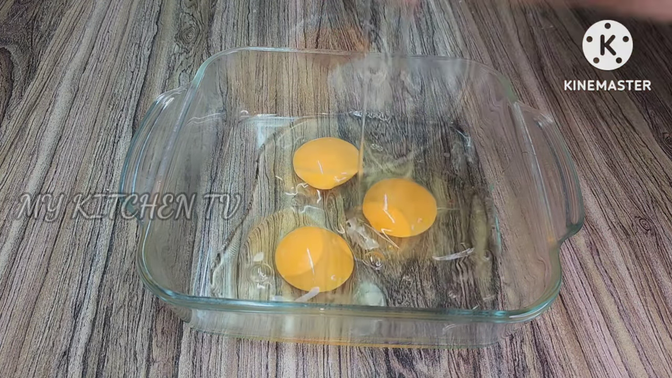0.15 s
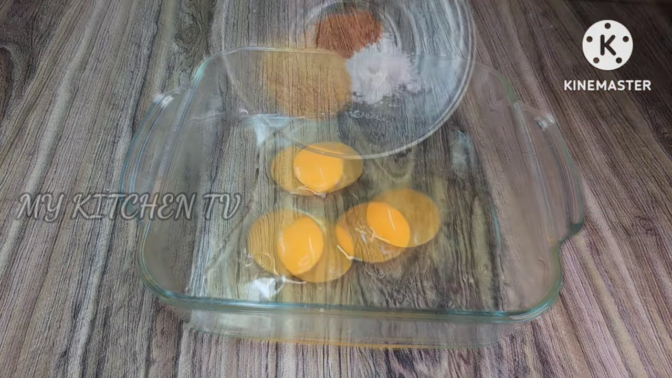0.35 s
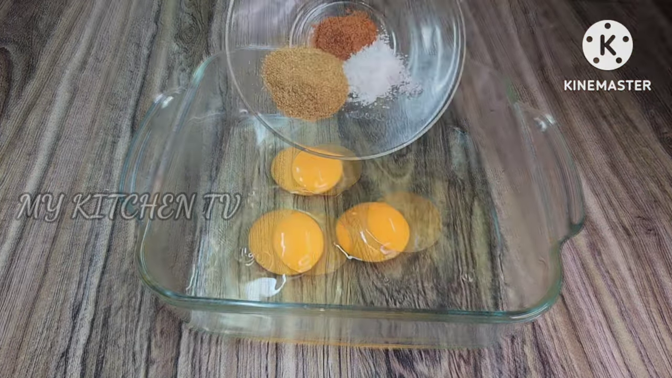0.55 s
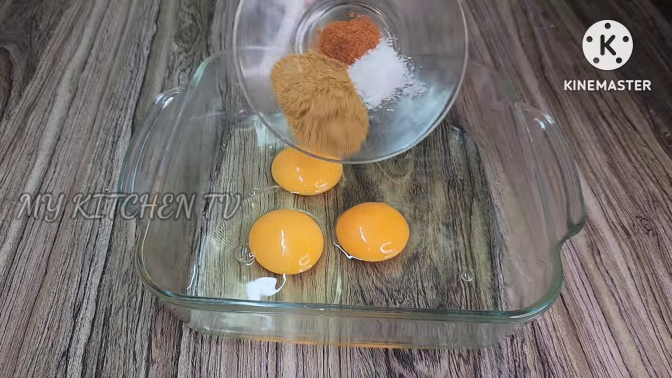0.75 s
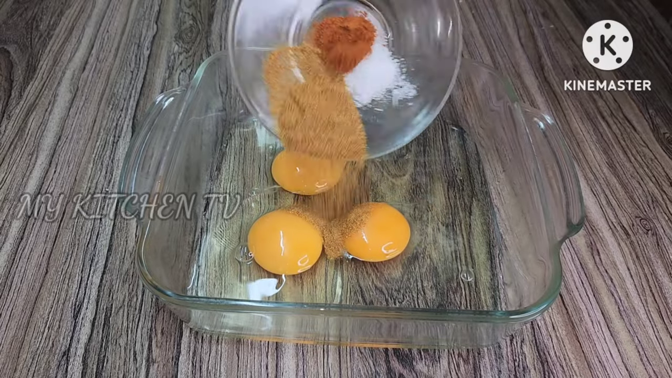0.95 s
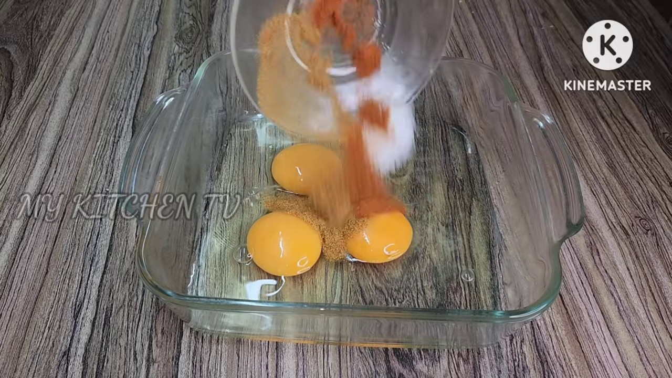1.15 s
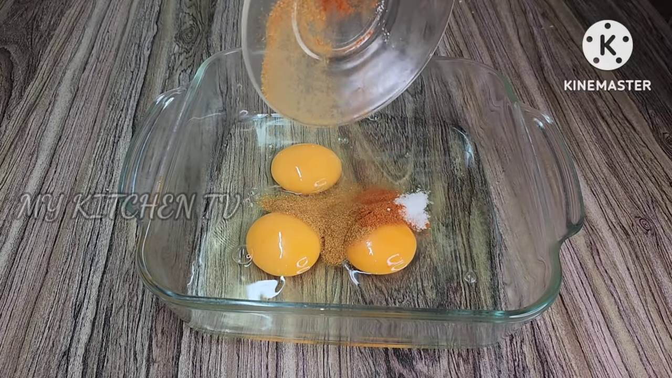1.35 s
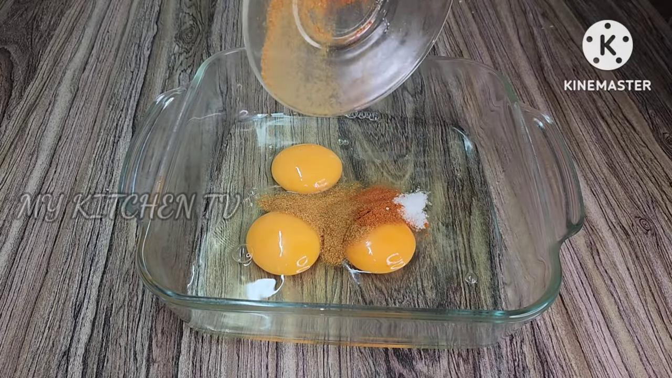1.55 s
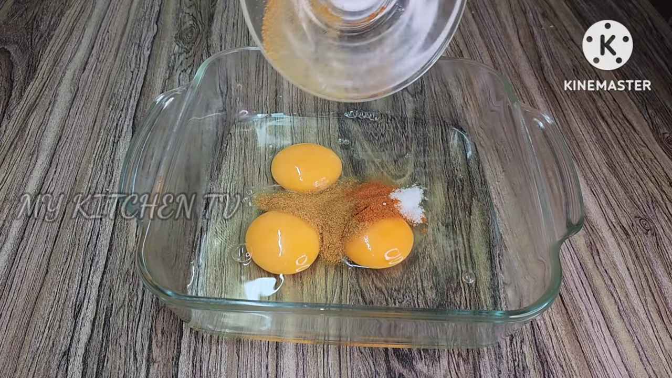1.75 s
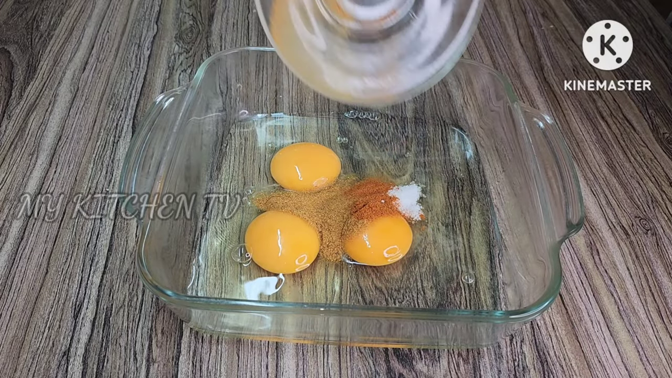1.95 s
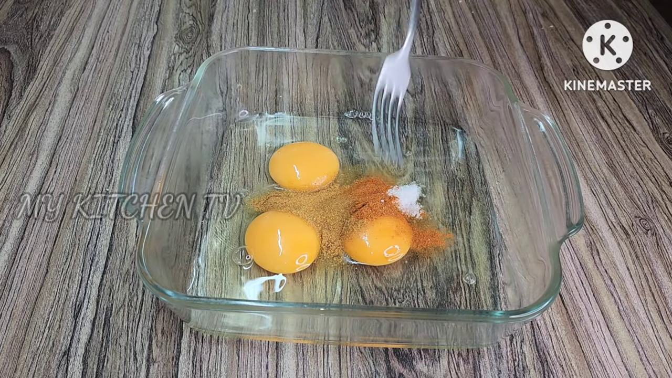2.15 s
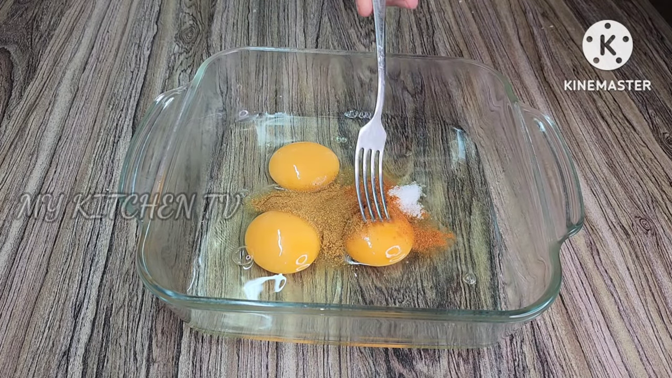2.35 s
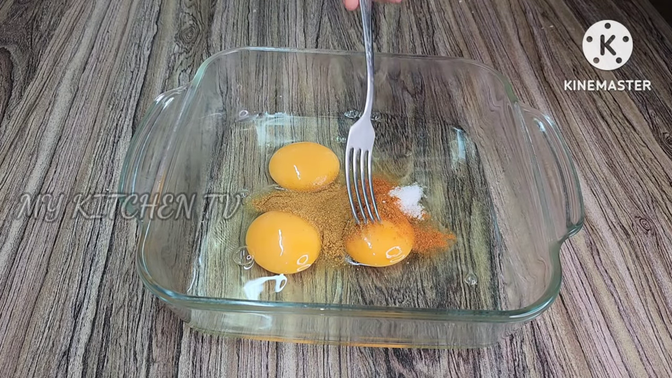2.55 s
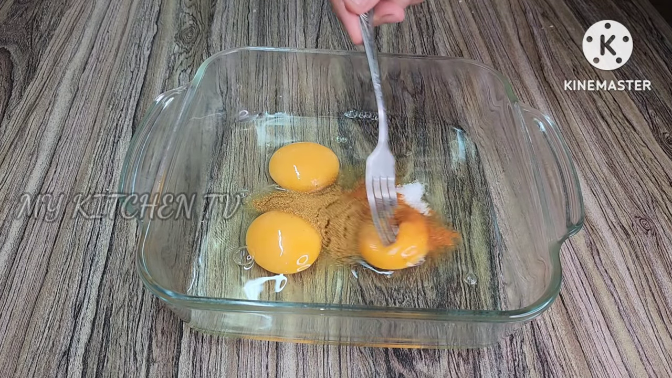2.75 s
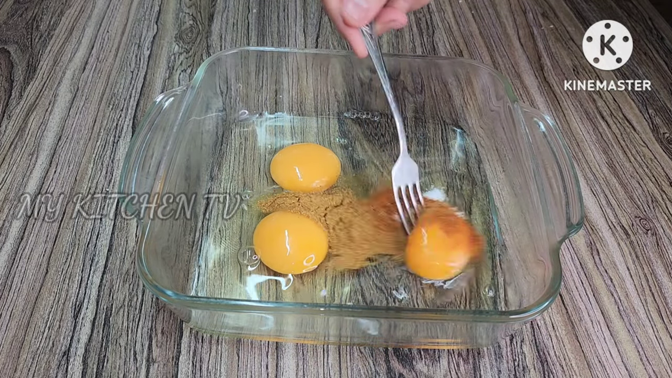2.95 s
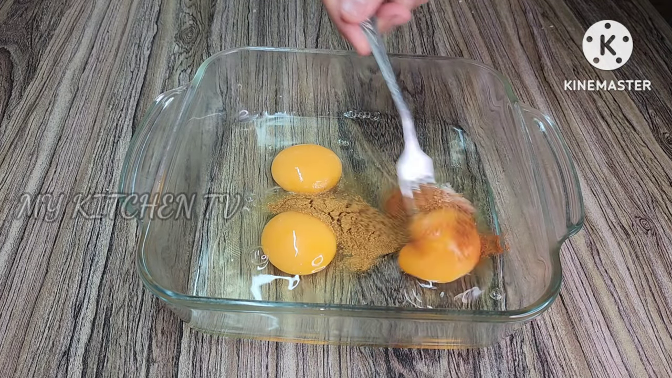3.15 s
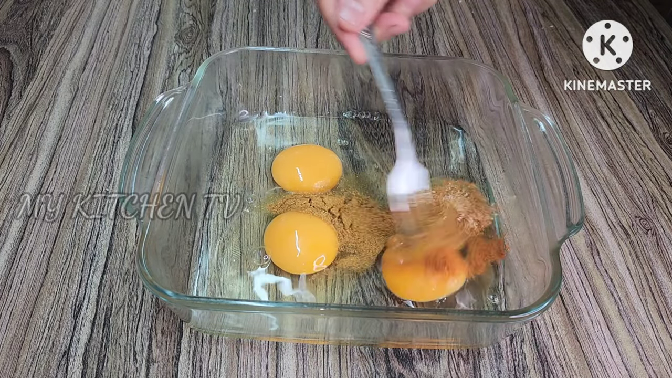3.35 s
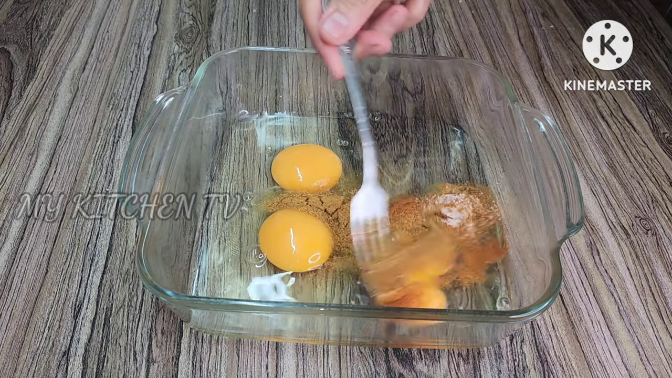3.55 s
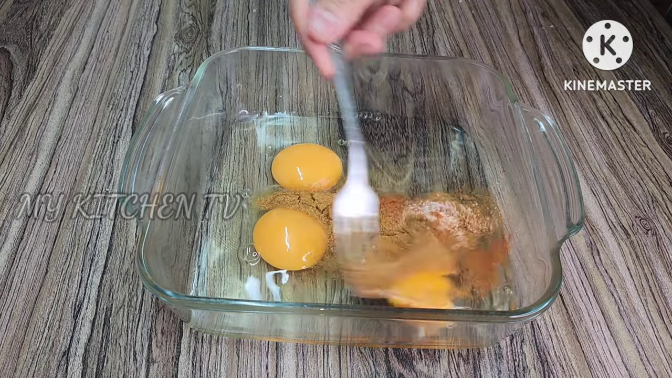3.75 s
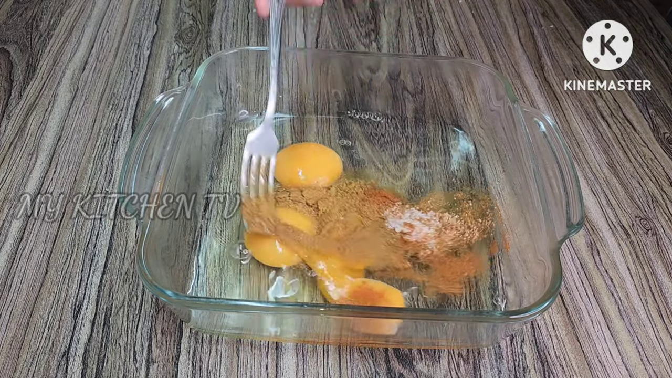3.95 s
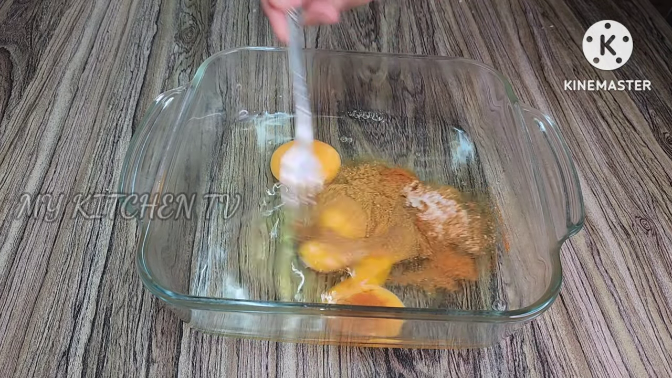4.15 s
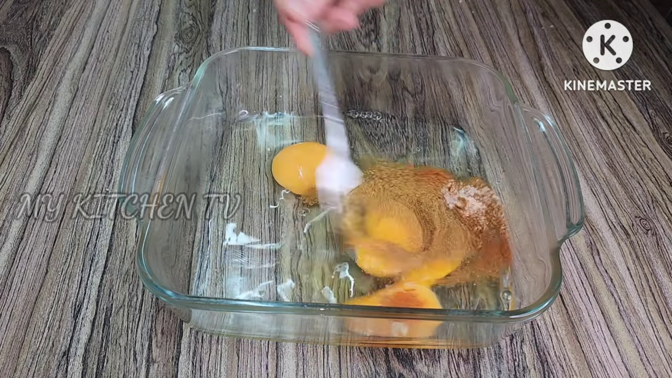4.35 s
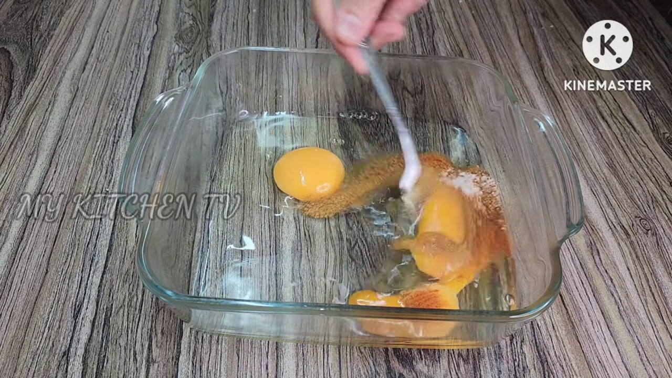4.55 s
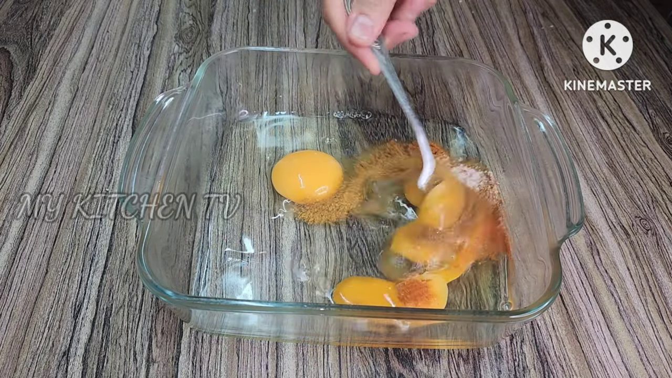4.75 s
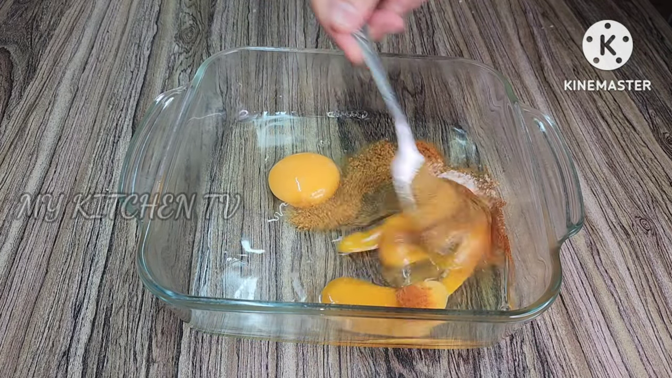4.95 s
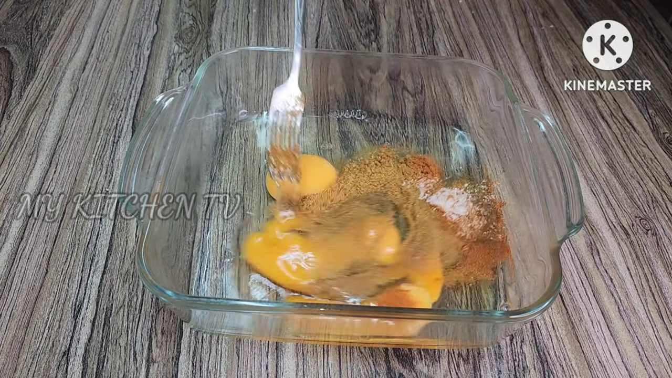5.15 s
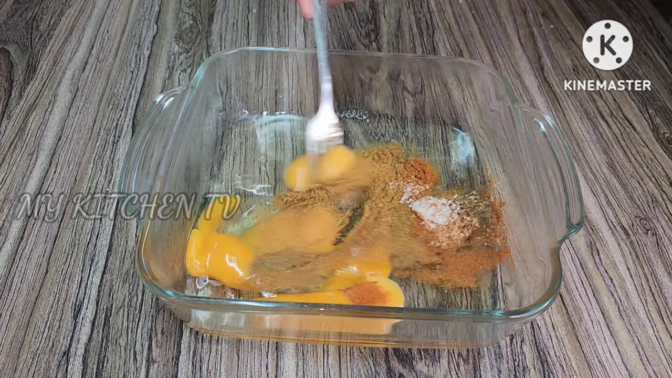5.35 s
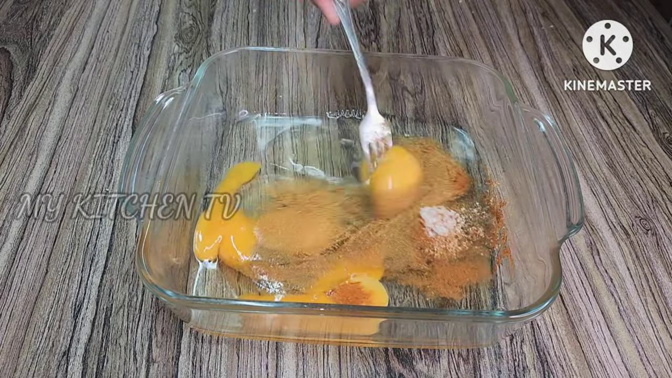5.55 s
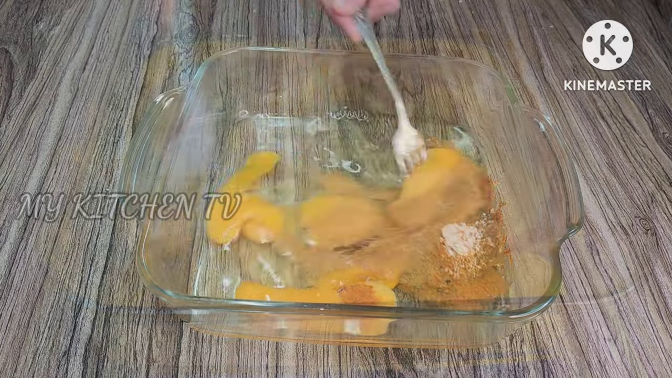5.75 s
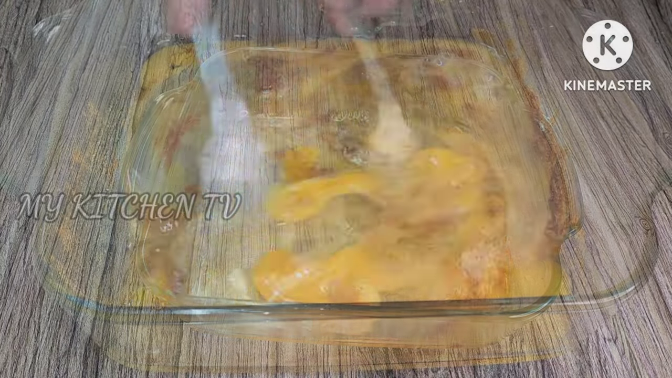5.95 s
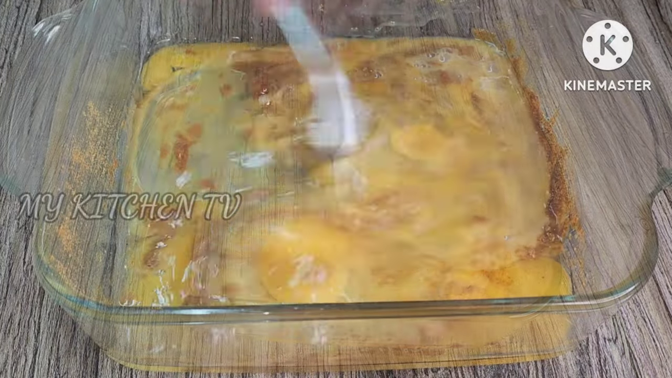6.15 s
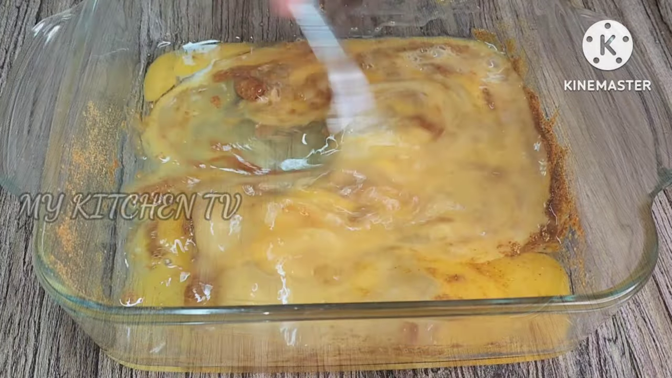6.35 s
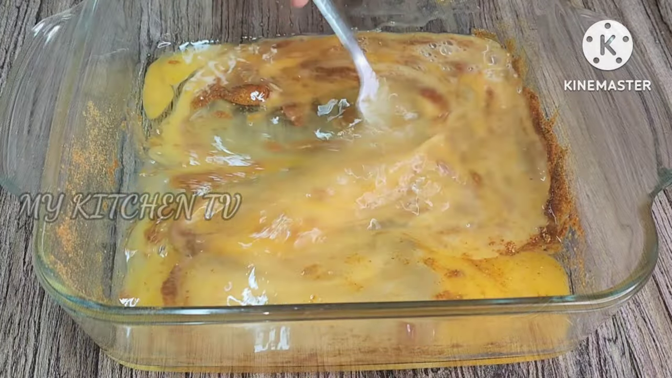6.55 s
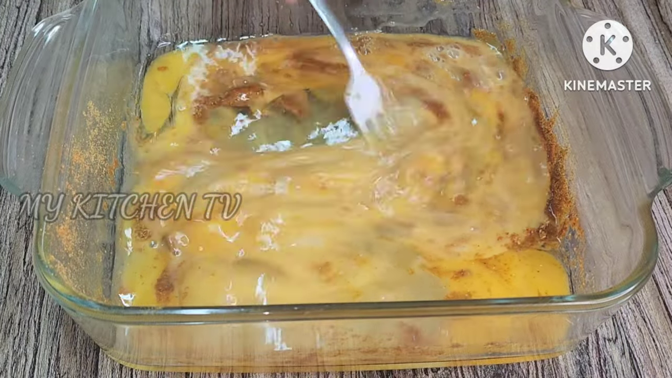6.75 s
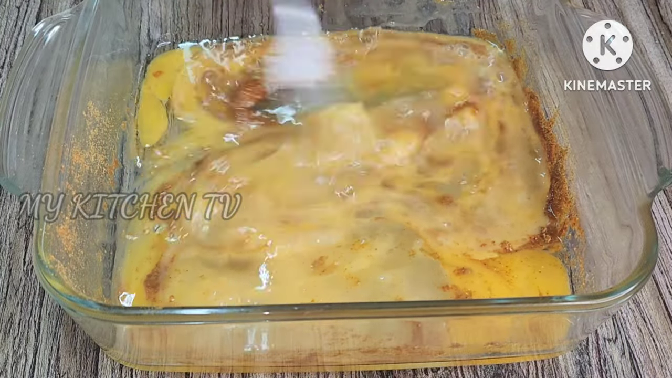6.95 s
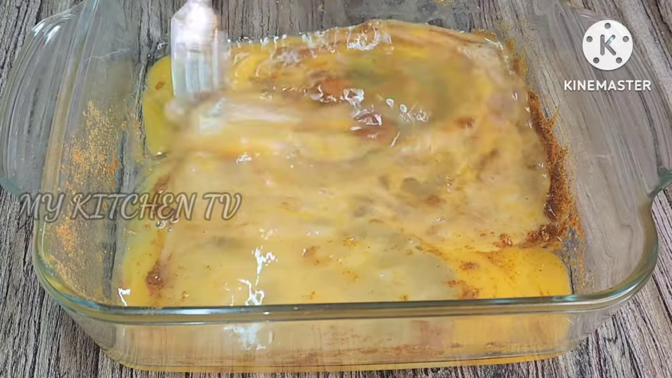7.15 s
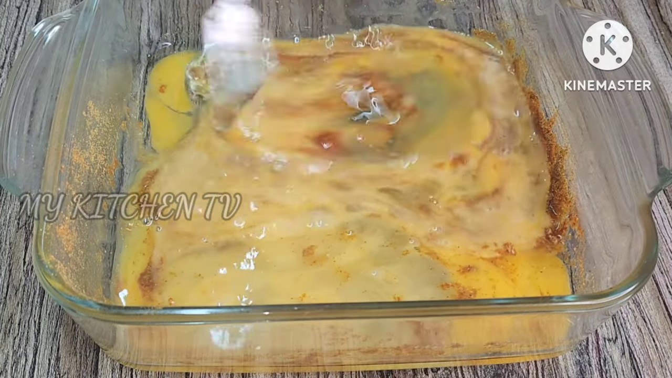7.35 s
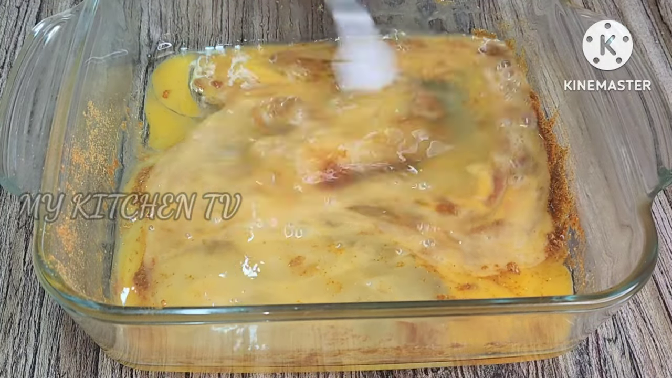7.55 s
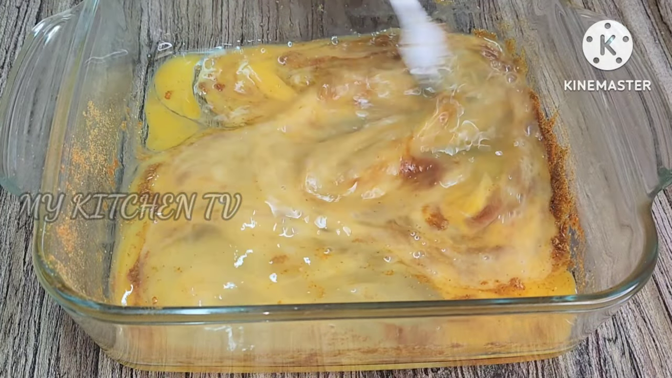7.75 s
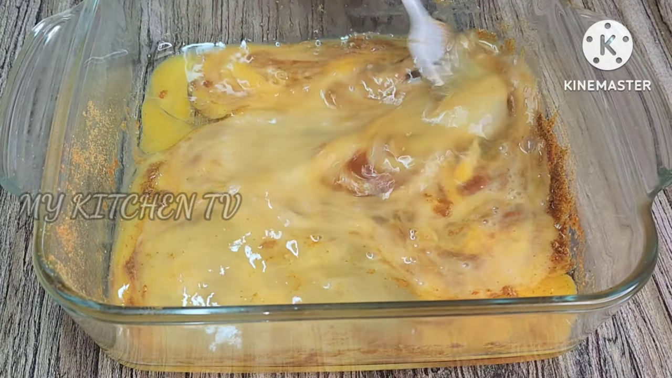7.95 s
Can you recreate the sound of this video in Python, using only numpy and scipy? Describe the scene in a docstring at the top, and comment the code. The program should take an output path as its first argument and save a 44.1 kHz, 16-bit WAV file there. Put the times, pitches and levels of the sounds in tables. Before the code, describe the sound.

Wet egg squelch, brief glassy scrape, then sparse fork clacks on a glass baking dish speeding into sloppy, squelching beating in a quiet kitchen.

```python
"""A steel fork stirs and then beats eggs in a glass baking dish, after a raw egg drops in and spices slide from a small bowl.
Each stroke excites filtered-noise clicks and decaying modes of steel and glass, and thumps the table below.
The egg squelches in clusters of damped sines, plops as air pockets ring, and rushes as coloured noise with bubbles.
A small quiet kitchen adds echoes, low rumble and hiss; close stereo microphones."""
import sys
import numpy as np
from scipy import signal
from scipy.fft import rfft, irfft, next_fast_len
from scipy.io import wavfile
from scipy.ndimage import map_coordinates

SR = 44100
rng = np.random.default_rng(int(sys.argv[2]) if len(sys.argv) > 2 else 0)


def pcm_store(signal):
    """Save signal as 16-bit PCM."""
    levels = np.round(np.clip(np.atleast_2d(signal), -1, 1) * 32767)
    wavfile.write(sys.argv[1], SR, levels.astype(np.int16).T)


N = 357210
T = np.arange(int(.3 * SR)) / SR  # time axis of one short sound [s]

# Strokes of the fork on the dish, all levels relative:
# (time [s], click level [dB], table thump level [dB], glass clack level [dB])
STROKES = [(2.9753, -24, -22, -43.5), (3.1672, -51.5, -36, -58), (3.3757, -65, -44.5, -81),
           (3.553, -67, -54.5, -81), (3.7171, -51, -34, -62.5), (4.1256, -38.5, -37.5, -48.5),
           (4.4565, -29.5, -30.5, -42), (4.6337, -31.5, -33.5, -45.5), (4.797, -34.5, -36, -48),
           (5.398, -24.5, -24, -38), (5.7683, -27, -30, -37), (6.0516, -34, -37.5, -43.5),
           (6.122, -44.5, -38.5, -50), (6.2501, -39, -48.5, -59), (6.295, -35.5, -41, -46),
           (6.4055, -35, -38.5, -51), (6.4842, -35.5, -47.5, -52), (6.6799, -32, -47, -44.5),
           (6.767, -38, -34, -44.5), (6.9519, -42, -36, -41), (7.1121, -25, -28, -32),
           (7.2758, -25, -22.5, -29.5), (7.4543, -55, -23.5, -41.5), (7.6233, -26.5, -27, -31.5),
           (7.8138, -26.5, -33, -33), (7.861, -18.5, -23, -27), (7.9669, -30, -33.5, -36)]
# Modes of the fork ringing against the glass: (frequency [Hz], relative level [dB], t60 [s])
STEEL_MODES = [(2390, -5, 0.12), (3300, -10, 0.11), (5970, -12.5, .08), (6290, -3, 0.087), (7150, -13, .1),
               (8400, -8.5, .1), (8830, -3, 0.11), (9160, 0.5, 0.13), (9800, 0.5, 0.076),
               (10660, -6.5, 0.073), (14720, -6, .08)]
# Spectrum of the steel click: (frequency [Hz], gain [dB])
CLICK_SPECTRUM = [(1500, -20), (4000, -11.5), (4600, -14.5), (5800, -4.5), (6500, -13), (7600, -4.5),
                  (9400, -2), (10700, -10), (11700, -19), (13300, -35), (15000, -16.5), (16000, -34.5)]
# Top treble of the hard tips: (frequency [Hz], gain [dB])
EDGE_SPECTRUM = [(10000, -40.5), (12200, -11), (13300, -6.5), (14100, -5), (15000, 3.5), (16000, -14.5)]
# Spectrum of moving egg: (frequency [Hz], gain [dB])
WET_SPECTRUM = [(400, -6), (800, -8.5), (1300, -2.5), (1900, -3.5), (2400, -2), (3400, -4), (4500, -11.5),
                (6500, -2.5), (9000, -7.5), (10500, -12.5), (11700, -9.5), (13000, -12), (15000, -5.5)]

LEAD_S = .012  # a faint hiss fades in over this time before each click
BEAT_START_S = 6.0  # slow stirring turns into beating
SPREAD_S = 3.8  # time constant of the egg spreading over glass and tines
HUM_DB = -20  # low hum after a thump, relative to its swings


def amp(db):
    """Level to amplitude: decibels become a linear gain."""
    return 10 ** (np.asarray(db) / 20)


def unit(x):
    """Power normalisation: scale to rms 1."""
    return x / np.sqrt(np.mean(x ** 2) + 1e-20)


def burst(x):
    """Energy normalisation: scale a short sound to the energy of 4 ms at rms 1."""
    energy = np.mean(np.sum(x ** 2, axis=-1))
    return x / np.sqrt(energy / (.004 * SR) + 1e-20)


def along(points, hz):
    """Interpolation of (frequency [Hz], value) points on a logarithmic frequency axis."""
    f, values = np.transpose(points)
    return np.interp(np.log(hz + 1), np.log(f), values)


def colour(x, points):
    """Minimum-phase filtering: folding the cepstrum makes the gain of (frequency [Hz], gain [dB]) points causal."""
    n = x.shape[-1]
    m = 2 * next_fast_len(n // 2 + 2048)
    gain = amp(along(points, np.fft.rfftfreq(m, 1 / SR)))
    cepstrum = irfft(np.log(gain))
    cepstrum[1:m // 2] *= 2
    cepstrum[m // 2 + 1:] = 0
    return irfft(rfft(x, m) * np.exp(rfft(cepstrum)), m)[..., :n]


def noise(points, side_db):
    """Mid-side stereo: independent coloured noises set the width, at rms 1 overall."""
    mid, side = colour(rng.standard_normal((2, N)), points)
    side = amp(side_db) * side
    return unit(np.array([mid + side, mid - side]))


def add(track, s, sound):
    """Superposition: mix a sound into the track at time s."""
    part = track[:, max(round(s * SR), 0):][:, :sound.shape[-1]]
    part += sound[..., :part.shape[1]]


def held(start, end, attack_s, release_s):
    """Exponential envelope: it rises to 1 at start, holds until end and dies away."""
    t = np.arange(N) / SR
    return np.exp(-np.maximum(start - t, 0) / attack_s - np.maximum(t - end, 0) / release_s)


def wobble(rate):
    """Band-limited fluctuation: a smooth random curve with rate knots a second."""
    knots = rng.standard_normal(int(N * rate / SR) + 4)
    return map_coordinates(knots, [np.arange(N) * rate / SR])


def kitchen(x, near_db, room_db):
    """Reverberation by convolution: quick echoes from dish and table top, and the room's decaying tail."""
    # decay of the room: (frequency [Hz], t60 [s])
    room_decay = [(200, .22), (1000, .22), (3000, .23), (9000, .2), (15000, .13)]
    hz, t, z = signal.stft(rng.standard_normal((2, len(T))), SR, nperseg=256)
    decay = amp(-60 * t / along(room_decay, hz)[:, None])
    tail = signal.istft(z * decay, SR, nperseg=256)[1][:, :len(T)] * (T > .005)
    near = rng.standard_normal((2, len(T))) * np.exp(-T / 0.0046) * (T > .003)
    tail = amp(room_db) * tail / np.linalg.norm(tail[0])
    near = amp(near_db) * near / np.linalg.norm(near[0])
    mid, side = tail + near
    # long waves reach both microphones alike
    side = signal.sosfilt(signal.butter(1, 1400, "high", fs=SR, output="sos"), side)
    response = np.array([mid + side, mid - side]) / np.sqrt(2)
    return x + signal.fftconvolve(np.atleast_2d(x), response, axes=1)[:, :len(T)]


def spot(x):
    """Local resonance: each place in the dish favours other narrow bands, at unchanged total energy."""
    ripple_db, width_hz = 4, 260  # depth of the random ripple and spacing of its knots
    hz = np.fft.rfftfreq(len(T), 1 / SR)
    knots = rng.standard_normal(int(hz[-1] / width_hz) + 4)
    ripple = map_coordinates(knots, [hz / width_hz])
    y = colour(x, np.column_stack([hz + 1, ripple_db * ripple]))
    return y * np.linalg.norm(x) / np.linalg.norm(y)


def crackle(starts, hz, spread, cycles, scatter_db, size):
    """Bubble acoustics: softly starting damped sines of scattered pitch, strength and direction."""
    count, t = len(starts), np.arange(200) / SR
    f = np.clip(hz * np.exp(spread * rng.standard_normal((count, 1))), 600, 15000)
    life = f * t * np.exp(-f * t / cycles) * np.cos(np.pi / 2 * t / t[-1])
    strength = np.sqrt(f) * amp(scatter_db * rng.standard_normal((count, 1)))
    grains = np.sin(2 * np.pi * f * t) * life * strength
    # arrival differs between microphones by up to 16 samples
    arrive = np.abs(starts * SR + rng.uniform(0, 16, (2, count))).astype(int)
    places = [(a[:, None] + np.arange(len(t))).ravel() for a in arrive]
    return np.array([np.bincount(place, grains.ravel(), size)[:size] for place in places])


def ring(modes, scatter_db, detune=0):
    """Modal synthesis: decaying modes with new strengths for each blow and microphone, and scattered pitch."""
    hz, db, t60 = np.transpose(modes)
    hz = hz * (1 + detune * rng.standard_normal(len(hz)))  # grip and egg shift the pitch
    strength = amp(db + scatter_db * rng.standard_normal((2, len(hz))))
    gain = strength * np.exp(2j * np.pi * rng.random((2, len(hz))))
    partials = amp(-60 * T / t60[:, None]) * np.exp(2j * np.pi * hz[:, None] * T)
    return (gain @ partials).imag * (1 - np.exp(-T / .001))


def thump(hum_db):
    """Damped oscillation: a few strong low swings of the table, then a weak low hum that ends abruptly near 0.1 s."""
    # modes of the table under the dish: (frequency [Hz], relative level [dB], Gaussian life [s])
    table_modes = [(162, -1, 0.018), (105.9, -12.5, 0.021), (81, -29, 0.07), (285.7, -33.5, 0.0092)]
    t, detune = np.maximum(T - .0015, 0), 1 + 0.045 * rng.standard_normal()
    swing = sum(amp(db) * np.sin(2 * np.pi * hz * detune * t) * np.exp(-(t / life) ** 2)
                for hz, db, life in table_modes)
    cutoff = np.exp(-(t / 0.11) ** 6) * (1 - np.exp(-t / 0.11))
    hum = amp(hum_db) * np.sin(2 * np.pi * 166 * t) * cutoff
    return (swing + hum) * (1 - np.exp(-t / 0.0085))


def background():
    """Stationary noise under slow envelopes: rumble and hiss swell together, and a soft swish stops short."""
    # spectrum of the room rumble: (frequency [Hz], gain [dB])
    rumble_spectrum = [(20, -19.5), (36, -12), (48, 6), (60, -5.5), (80, -9), (125, -9), (160, -14.5),
                       (250, -32.5), (420, -39.5), (650, -58.5)]
    # spectrum of the thin hiss: (frequency [Hz], gain [dB])
    hiss_spectrum = [(150, -37.5), (250, -9), (393, -3), (510, -9), (629, -7.5), (1980, -12), (2760, -13.5),
                     (7060, -20), (7570, -17.5), (16000, -31.5)]
    # swells of the rumble while egg and spices go in: (start [s], end [s], level [dB])
    swells = [(0, 0.39, -64.5), (1.85, 2.105, -58.5)]
    # swells of the soft hiss: (time [s], relative peak level [dB])
    swishes = [(1.83, -68), (2.044, -59.5), (2.177, -55.5)]
    # spectrum of the swish: (frequency [Hz], gain [dB])
    swish_spectrum = [(290, -42), (500, -19), (570, -19.5), (4600, -4.5), (5970, -6.5), (7420, 0),
                      (14700, -22), (16000, -15.5)]
    rumble_db, hiss_db = -65, -77  # steady levels in the quiet room
    rise_s, fall_s, swish_end_s = 0.031, .055, 2.275
    swell = sum(amp(db) * held(start, end, attack_s=0.65, release_s=0.069) for start, end, db in swells)
    rumble = np.hypot(amp(rumble_db), swell) * noise(rumble_spectrum, side_db=-9)
    hiss = np.hypot(amp(hiss_db), amp(-11) * swell) * noise(hiss_spectrum, side_db=0.5)
    swish = sum(amp(db) * held(s, s, rise_s, fall_s) for s, db in swishes)
    stop = held(0, swish_end_s, attack_s=1, release_s=0.021)
    return rumble + hiss + amp(1) * swish * stop * noise(swish_spectrum, side_db=0)


def churn():
    """Flow noise with bubbles: moving egg gives an uneven wet rush as it is poured and under the beating."""
    # egg runs out of the shell: (start [s], end [s], level [dB])
    pours = [(0, 0.103, -46.5), (0.188, 0.31, -62.5)]
    beat_db, growth_db_per_s = -70, 3  # the beating gathers force
    pops = crackle(rng.uniform(0, N / SR, size=9000), 2200, spread=.55, cycles=3, scatter_db=3, size=N)
    egg = amp(-1.5) * unit(pops) + amp(-2.5) * noise(WET_SPECTRUM, side_db=-1)
    egg = egg * amp(2.3 * wobble(40))
    pouring = sum(amp(db) * held(start, end, attack_s=.012, release_s=0.011) for start, end, db in pours)
    beating_db = beat_db + growth_db_per_s * (np.arange(N) / SR - BEAT_START_S)
    beating = amp(beating_db) * held(BEAT_START_S + 0.061, N / SR, attack_s=0.025, release_s=1)
    return egg * (pouring + beating)


def tear(db, hz):
    """Film rupture: a film of egg tears in a quick cluster of tiny pops and higher fizz."""
    tear_s = .015  # longest delay of a pop within the tear
    pops = crackle(tear_s * rng.beta(.9, 2.6, size=30), hz, spread=.45, cycles=1.3,
                   scatter_db=4, size=len(T))
    fizz = crackle(tear_s * rng.beta(1.2, 2.4, size=40), 8560, spread=0.13, cycles=1.01,
                   scatter_db=4.5, size=len(T))
    film = spot(burst(pops) + amp(-9.5) * burst(fizz))
    return amp(db - 14.5) * kitchen(film, near_db=-1.0, room_db=-10)


def squelches():
    """Adhesion and rupture: egg tears as it falls and folds; beating strokes cut, slap, pull threads and smack."""
    # sticky egg tearing and slapping: (time [s], relative level [dB], centre frequency [Hz])
    egg_tears = [(0.003, -21, 2560), (0.031, -23.5, 2970), (0.082, -20.5, 1640), (0.099, -23, 1550),
                 (0.207, -34.5, 2130), (0.22, -37, 2530), (0.241, -31, 7440), (0.307, -24, 2460),
                 (0.315, -48.5, 2030), (6.039, -26.5, 1820), (6.083, -30, 3340), (6.266, -33, 2270),
                 (6.302, -33.5, 1350), (6.582, -23, 2180), (6.672, -16, 2200), (7.005, -26.5, 3150),
                 (7.044, -35.5, 3500), (7.18, -30, 1270), (7.204, -30.5, 1410), (7.356, -16, 1600),
                 (7.526, -15, 1410), (7.734, -34, 4020), (7.785, -38, 3430), (7.986, -28, 1500)]
    # offsets from the stroke: time [s], and level [dB] against the clack column
    enter_s, enter_db = 0.013, -6.5  # the tines cut into the egg before they land
    slap_s, slap_db = 0.0023, 9.5  # the stroke slaps the egg just after it lands
    # relative levels of their own
    lift_s, lift_db, lift_hz = .045, -42.5, 6630  # a thread of egg snaps as the fork lifts
    smack_db, smack_hz = -48, 2980  # small smacks between the strokes
    out = np.zeros((2, N))
    for s, db, hz in egg_tears:
        add(out, s + 0.0025, tear(db, hz))
    for s, _, _, clack_db in STROKES:
        if s > BEAT_START_S:
            add(out, s - enter_s, tear(clack_db + enter_db, hz=2820))
            add(out, s + slap_s, tear(clack_db + slap_db, hz=2330))
            add(out, s + lift_s + rng.normal(0, 0.013), tear(lift_db, lift_hz))
            delays = rng.uniform(0.021, .16, size=2)
            for delay, size, pitch in zip(delays, *rng.standard_normal((2, 2))):
                add(out, s + delay, tear(smack_db + 3 * size, smack_hz * np.exp(.4 * pitch)))
    return out


def pocket(hz, t60):
    """Bubble resonance: an air pocket snaps open and rings briefly, its pitch rising."""
    pitch = hz * (.97 + .09 * (1 - np.exp(-2 * T / t60)))
    phase = 2 * np.pi * np.cumsum(pitch) / SR
    return np.sin(phase) * amp(-60 * T / t60) * (1 - np.exp(-T * hz / .6))


def plops():
    """Bubble break-up: fast-collapsing pockets split into a larger and a smaller one, which broadens the plop."""
    # air pockets ringing in the egg: (time [s], relative level [dB], nominal frequency [Hz], t60 [s])
    pockets = [(0.016, -23, 2496, 0.063), (0.026, -24.5, 3063, 0.041), (0.06, -25.5, 1099, 0.11),
               (0.221, -45, 2130, 0.1), (0.308, -37, 2250, 0.033), (6.043, -31.5, 1695, 0.059),
               (6.229, -43.5, 2790, 0.019), (6.272, -31.5, 2475, 0.028), (6.616, -35, 2380, .04),
               (7.009, -28, 934, 0.029), (7.184, -30.5, 880, 0.028), (7.208, -37, 748, 0.052),
               (7.357, -5, 1346, 0.007), (7.53, -17, 818, 0.032), (7.837, -29.5, 1647, 0.025),
               (7.99, -23.5, 858, 0.05)]
    # the egg lands: (time [s], relative thump level [dB])
    landing = (0.068, -36)
    out = np.zeros((2, N))
    for s, db, hz, t60 in pockets:
        lower, higher = hz * np.array([.62, 1.22]) * np.exp(.03 * rng.standard_normal(2))
        pieces = amp(-13) * pocket(lower, .02) + amp(-6) * pocket(higher, .014)
        pieces = np.roll(pieces, round(.001 * SR))  # 1 ms after the snap
        plop = pocket(hz, t60) + min(.014 / t60, 1) * pieces
        add(out, s, amp(db - 0.5) * kitchen(plop, near_db=-4, room_db=-11.0))
    landing_s, landing_db = landing
    add(out, landing_s, amp(landing_db) * thump(HUM_DB))
    return out * amp([[1.3], [-1.3]])  # louder on the left


def bowl():
    """Friction-driven resonance: uneven grip makes the small glass bowl sing faintly as it tips."""
    # modes of the spice bowl: (frequency [Hz], relative level [dB], t60 before extra damping [s])
    bowl_modes = [(2380, -29, 0.14), (3400, -18, .06), (5416, -7.5, 0.083), (5710, -5, 0.053),
                  (7723, 7.5, 0.044), (10510, -5.5, .05), (13370, -7, 0.027)]
    # powder slides off the glass, then the last heap slips: (start [s], end [s], relative level [dB])
    slides = [(1.019, 1.316, -72), (1.199, 1.229, -43.5)]
    slide = sum(amp(db) * held(start, end, attack_s=.01, release_s=.006) for start, end, db in slides)
    grip = rng.standard_normal((2, N)) * slide * amp(2.5 * wobble(30))
    modes = ring(bowl_modes, scatter_db=1) * np.exp(-T / .008)  # extra damping
    singing = signal.fftconvolve(grip, modes / np.linalg.norm(modes[0]), axes=1)[:, :N]
    return amp(3.5) * singing + amp(-19) * grip


def contact(points):
    """Shaped noise burst: a faint hiss fades in before the click, then a sharp click of a few milliseconds."""
    t = T - LEAD_S
    click = (1 - np.exp(-np.maximum(t, 0) / 0.0014)) * np.exp(-(t / 0.0045) ** 2)
    lead_in = amp(-12.5) * np.exp(-np.abs(t) / 0.002) * np.minimum(T / LEAD_S, 1) ** 2
    return burst(colour((click + lead_in) * rng.standard_normal((2, len(T))), points))


def late(x):
    """Causality: hold a sound back until the click."""
    return np.pad(x, ((0, 0), (round(LEAD_S * SR), 0)))[:, :len(T)]


def wake():
    """Cavity closure: egg closes behind the tines in a short rush of small bubbles."""
    starts = np.minimum(0.0055 + rng.gamma(1.4, .02, size=260), .25)
    pops = crackle(starts, 5700, spread=0.91, cycles=0.53, scatter_db=0.5, size=len(T))
    return burst(colour(pops, WET_SPECTRUM) * np.exp(-T / 0.049))


def fork():
    """Impact and damping: strokes excite steel, glass, egg and table; harder clicks are brighter, egg damps the rings."""
    # spectrum of the glass clack: (frequency [Hz], gain [dB])
    clack_spectrum = [(300, -0.5), (600, -18.5), (950, -72.5), (1250, -2), (1600, -6.5), (1950, -5.5),
                      (2380, 10), (2850, -9.5), (3450, 4.5), (4300, -25.5), (7000, -23)]
    # the dish's own long ring: (frequency [Hz], relative level [dB], t60 [s])
    glass_modes = [(3070, -8, .28), (3870, 0, 0.068), (4250, -14, 0.17), (5057, 3, 0.18),
                   (5890, -9.5, 0.11), (6860, -4, 0.1), (8000, -12, .1)]
    # the dish rocks on its base: (frequency [Hz], relative level [dB], t60 [s])
    rocking_modes = [(405, 0.5, 0.088), (366.6, -11.5, 0.085)]
    # offsets [dB] from the stroke's columns, bare; then the change once covered in egg
    steel_db, steel_damped_db = -11, -4  # from the click
    glass_db, glass_damped_db = -13, -39  # from the mean of click and thump
    knock_db, knock_damped_db = -14, -9  # from the thump
    stir_wake_db, beat_wake_db = -25, -10  # egg dragged by a stroke, from the thump
    hard_db, edge_db, edge_growth = -22, -30, 1.42  # hard click, its treble, dB of treble per dB of click
    heavy_db, hum_growth = -23, 0.19  # heavy thump, dB of hum share per dB of thump
    out = np.zeros((2, N))
    for s, click_db, thump_db, clack_db in STROKES:
        covered = 1 - np.exp(-(s - STROKES[0][0]) / SPREAD_S)
        force_db = (click_db + thump_db) / 2
        steel_ring = burst(ring(STEEL_MODES, scatter_db=2.5, detune=0.0049))
        steel = amp(click_db + steel_db + steel_damped_db * covered) * steel_ring
        glass_ring = burst(ring(glass_modes, scatter_db=6))
        glass = amp(force_db + glass_db + glass_damped_db * covered) * glass_ring
        wake_db = beat_wake_db if s > BEAT_START_S else stir_wake_db
        egg = amp(thump_db + wake_db) * wake()
        edge = amp(edge_db + edge_growth * (click_db - hard_db)) * contact(EDGE_SPECTRUM)
        edge = edge * amp([[1.5], [-1.5]])  # louder on the left
        click = amp(click_db - 6.0) * contact(CLICK_SPECTRUM)
        clack = amp(clack_db + 3.0) * contact(clack_spectrum)
        blow = spot(click + clack + edge + late(egg)) + late(steel + glass)
        add(out, s - LEAD_S, kitchen(blow, near_db=-9.5, room_db=-13.0) * amp([[.3], [-.3]]))
        hum_db = HUM_DB + hum_growth * (thump_db - heavy_db)
        low = amp(thump_db + 10.5) * thump(hum_db)
        rocking = ring(rocking_modes, scatter_db=0.5)[0]
        low = low + amp(thump_db + knock_db + knock_damped_db * covered) * rocking
        add(out, s, kitchen(low, near_db=-22, room_db=-19) * amp([[.25], [-.25]]))
    return out


def grazes():
    """Weak excitation: light touches of the tines tick and barely ring the fork."""
    # tines graze the glass: (time [s], relative level [dB])
    touches = [(3.1026, -42.5), (4.4944, -37), (4.6525, -25.5), (5.0909, -40), (5.9199, -53.5),
               (6.0439, -27.5), (6.0902, -39), (6.8887, -31.5), (7.3039, -28.5), (7.4467, -33),
               (7.4707, -25.5), (7.687, -32), (8.0311, -36.5)]
    out = np.zeros((2, N))
    for s, db in touches:
        steel = amp(-15) * late(burst(ring(STEEL_MODES, scatter_db=2, detune=.006)))
        tick = contact(CLICK_SPECTRUM) + steel + amp(-16) * contact(EDGE_SPECTRUM)
        add(out, s - LEAD_S, amp(db - 8.0) * kitchen(tick, near_db=-8.5, room_db=-14.0))
    return out


def shove():
    """Rigid-body motion: at the stroke with the loudest click the whole dish judders on the table."""
    shove_db, shove_hz = -28.5, 97
    out, hardest = np.zeros((2, N)), max(STROKES, key=lambda row: row[1])
    judder = np.sin(2 * np.pi * shove_hz * T) * np.exp(-((T - .012) / 0.01) ** 2)
    add(out, hardest[0], amp(shove_db) * judder)
    return out


def scene():
    """Linear superposition of everything at the table."""
    return fork() + grazes() + shove() + plops() + squelches() + churn() + bowl() + background()


def record(dry):
    """Band limiting: a steep low-pass of the recorder, with half amplitude at its limit."""
    top_hz = 15900
    m = next_fast_len(N + SR // 2)
    hz = np.fft.rfftfreq(m, 1 / SR)
    return irfft(rfft(dry, m) / (1 + (hz / top_hz) ** 90), m)[:, :N]


dry = scene()
out = record(dry)
pcm_store(out)
```